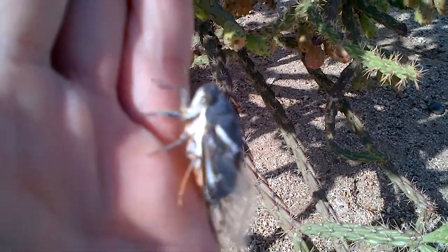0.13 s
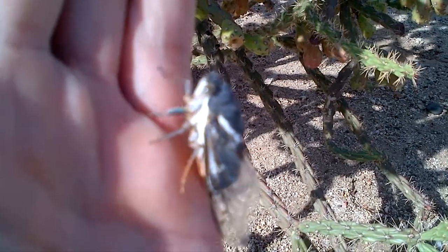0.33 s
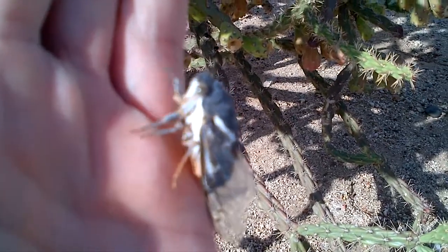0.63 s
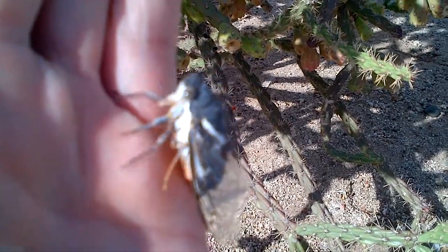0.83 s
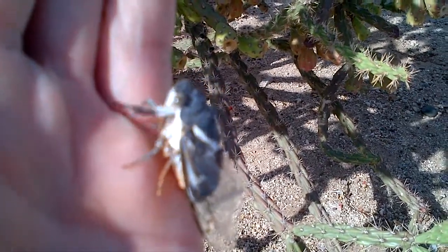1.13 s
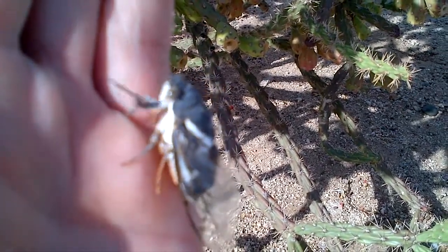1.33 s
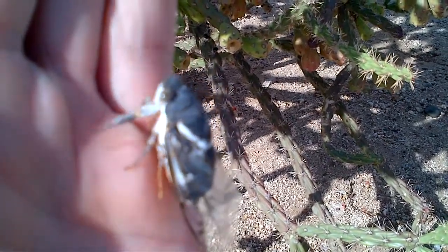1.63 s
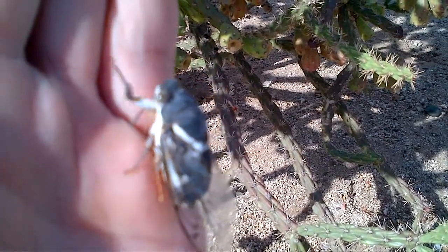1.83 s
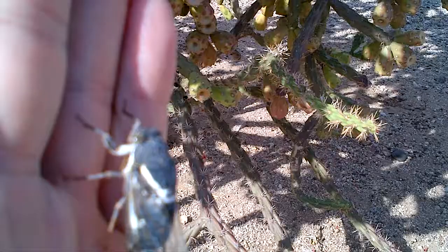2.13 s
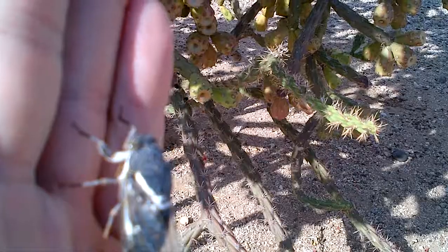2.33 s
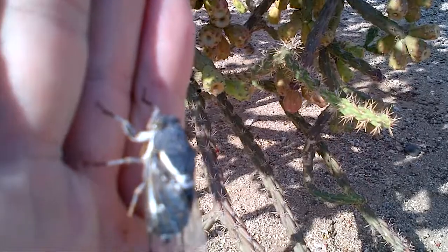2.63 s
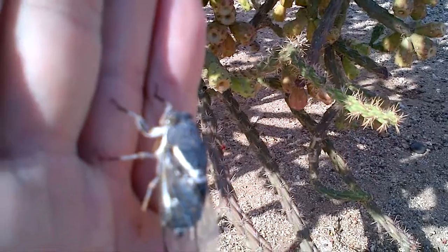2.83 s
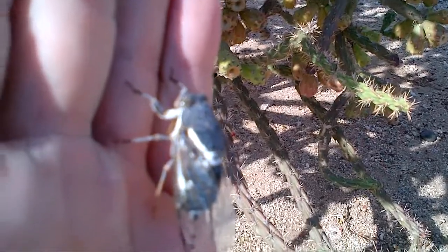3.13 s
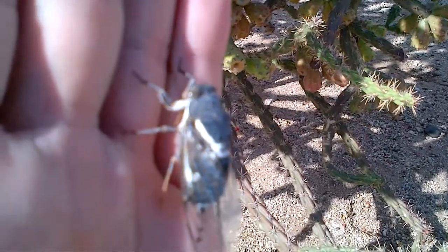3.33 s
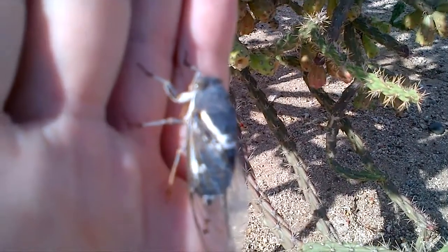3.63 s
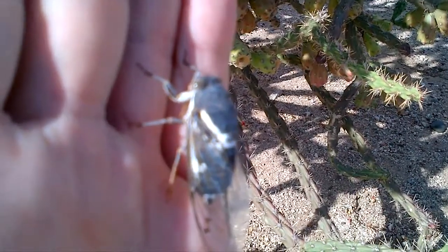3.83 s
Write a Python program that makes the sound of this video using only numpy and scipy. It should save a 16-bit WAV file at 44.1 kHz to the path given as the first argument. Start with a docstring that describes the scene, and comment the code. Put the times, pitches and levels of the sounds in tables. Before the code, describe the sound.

A cicada starts a loud, pulsing buzz up close after knocks on the microphone.

```python
"""Cicada on a hand

A quiet desert garden, one microphone. Close up, a hand knocks on the microphone housing, then the cicada
sitting on it starts to buzz. Its tymbals buckle about 470 times a second, each cycle a quick downward
sweep of rib clicks, and the buzz swells into short loud bursts about 31 times a second.
Far off, birds whistle over still air and a low hum; two light puffs of wind touch the microphone."""
import sys
import numpy as np
from scipy import signal
from scipy.fft import rfft, irfft
from scipy.io import wavfile

SR = 44100
rng = np.random.default_rng(int(sys.argv[2]) if len(sys.argv) > 2 else 0)


def int16_out(signal):
    """Quantize to a 16-bit WAV file."""
    q = np.round(np.clip(np.atleast_2d(signal).T, -1, 1) * 32767)
    wavfile.write(sys.argv[1], SR, q.astype(np.int16))


N = 176400

CALL_START_S, ONSET_S = 2.13, .006
STEADY_HZ, WHINE_HARMONIC = 470.6, 5
JITTER, STRAIN_JITTER = .0012, .25  # the beat gets uneven away from its steady rate
PHASE_WANDER_RAD = .32
# How fast the tymbals buckle (time [s], rate [Hz])
TYMBAL_RATE = [(2.15, 464.6), (2.44, 470), (2.63, 470.7), (3.0, 470.6), (3.07, 472.5), (3.154, 479),
               (3.18, 469.3), (3.26, 470.8), (3.58, 471), (3.65, 469), (3.738, 464.3), (3.87, 469.6),
               (3.925, 478), (3.99, 465.7)]


def cicada(t):
    """On the hand, close to the microphone: buckling tymbals give a pulsing buzz, a whine and a rasp."""
    rate, = curves(TYMBAL_RATE, t)
    unevenness = JITTER + STRAIN_JITTER * np.abs(rate / STEADY_HZ - 1)
    phase = 2 * np.pi * np.cumsum(rate * (1 + unevenness * wander(300))) / SR
    call = tymbal_buzz(t, phase) + whine(t, phase)
    return call * np.clip((t - CALL_START_S) / ONSET_S, 0, 1)


BURST_DB, BURST_TREBLE_DB, SOFT_DB, RING_ON_DB = -6.5, 6, -3.5, -5  # added to the table levels
SCATTER_DB, SHIMMER_DB, SOFT_SHIMMER_DB = .6, 2, 3.5
OPENING_S, THIN_DB = .34, -16  # the lowest harmonics of the bursts fill in as the call gets going
REBOUND_CYCLES, REBOUND_FROM_HZ = .565, 5400  # a second, bright click within each tymbal cycle
REBOUND_SHARE, REBOUND_OPENING_EXTRA = .37, .17
RIPPLE_DB, RIPPLE_SPAN_HZ = 1.8, 7000  # broad changes of colour from burst to burst
# How the bursts evolve (time [s], length [ms], level below 5 kHz [dB], level at 5-9.6 kHz [dB])
BURST_SHAPE = [(2.154, 3.7, -31.5, -36), (2.284, 4.6, -32, -30), (2.316, 4.9, -35, -33.5),
               (2.447, 7.5, -34.5, -29.5), (2.545, 8.1, -34, -29.5), (2.611, 5.5, -30.5, -25),
               (2.677, 6.9, -26, -25.5), (2.71, 3.9, -27, -24.5), (2.777, 8.1, -29.5, -27),
               (2.943, 7, -28, -27.5), (3.01, 8.9, -33, -26.5), (3.043, 7.9, -28.5, -25.5),
               (3.076, 8.2, -29.5, -25), (3.174, 7.1, -27, -25.5), (3.22, 11.3, -31.5, -24),
               (3.301, 11.3, -30, -28.5), (3.431, 8.2, -30.5, -25.5), (3.686, 11.8, -30, -27),
               (3.715, 8.8, -37.5, -28), (3.747, 10.7, -36.5, -28), (3.811, 10.5, -29, -24.5),
               (3.905, 10, -26, -27), (3.971, 9.5, -29, -25.5)]
# The buzz under the bursts (time [s], level between bursts [dB], treble level [dB])
SOFT_LEVELS = [(2.17, -46.5, -41), (2.43, -48, -38), (2.5, -43.5, -35), (2.62, -38.5, -35.5),
               (2.793, -41.5, -35.5), (3.026, -40, -36), (3.059, -42, -36), (3.092, -40, -36),
               (3.22, -45, -36.5), (3.447, -37.5, -36), (3.479, -46.5, -37.1), (3.512, -41, -35.5),
               (3.576, -47, -37.5), (3.609, -42, -34.5), (3.639, -47, -37.5), (3.67, -43, -37.5),
               (3.924, -40.5, -36.5), (3.955, -48, -37), (3.987, -42, -36.5)]
# Colour of the insect's body in the bursts (frequency [Hz], gain [dB])
BURST_COLOUR = [(1880, -39), (2820, -9), (3290, -4.5), (3760, 2.5), (4230, 4), (4700, -0.5), (5170, -4),
                (5640, -1.5), (6100, -3), (7520, -3), (9400, -7), (9870, -13.5), (10340, -10), (11280, -6),
                (12700, -19.5), (15040, -40)]
# Its colour in the soft buzz (frequency [Hz], gain [dB])
SOFT_COLOUR = [(940, -30.5), (1410, -29), (1880, -22.5), (2820, -18.5), (3290, -7), (4230, -7.5),
               (4700, -3), (5640, -11), (8900, -11), (9870, -6.5), (11000, -4), (12220, -11.5),
               (15040, -15.5)]
# When each frequency sounds within one tymbal cycle (frequency [Hz], delay [ms])
RIB_SWEEP = [(2500, 1.7), (3700, 1.4), (4500, 1.15), (5600, .72), (7000, .45), (9500, .1), (12000, .9),
             (15000, .3)]


def tymbal_buzz(t, phase):
    """Rib clicks and their rebounds as a stack of harmonics plus rasp: loud in bursts, soft between."""
    length_ms, low_db, high_db = curves(BURST_SHAPE, t)
    between_db, treble_db = curves(SOFT_LEVELS, t)
    gate = burst_gate(t, length_ms)
    burst = gate * undb(SCATTER_DB * wander(30))
    opening = np.clip(1 - (t - CALL_START_S) / OPENING_S, 0, 1)
    harmonics_hz = np.arange(1, 33) * STEADY_HZ
    lags = 2 * np.pi * np.cumsum(at_hz(RIB_SWEEP, harmonics_hz)) * STEADY_HZ / 1000
    ripple = RIPPLE_DB * (wander(31) + 1j * wander(31))
    buzz = np.zeros(N)
    for k, (hz, lag) in enumerate(zip(harmonics_hz, lags), 1):
        if k == WHINE_HARMONIC:
            continue
        click = np.exp(1j * (k * phase - lag + PHASE_WANDER_RAD * wander(20)))
        rebound = (REBOUND_SHARE + REBOUND_OPENING_EXTRA * opening) * (hz > REBOUND_FROM_HZ)
        pair = click * (1 + rebound * np.exp(-2j * np.pi * k * REBOUND_CYCLES)) / np.hypot(1, rebound)
        is_treble = hz > 9600
        body_db = (low_db if hz < 5000 else high_db) + BURST_DB
        loud_db = at_hz(BURST_COLOUR, hz) + (treble_db + BURST_TREBLE_DB if is_treble else body_db)
        loud_db += THIN_DB * opening * (hz < 3500) + SHIMMER_DB * wander(30)
        shimmer_db = SOFT_SHIMMER_DB * wander(24.875)
        if is_treble or k < WHINE_HARMONIC:  # both ends of the spectrum ring on through the bursts
            soft = undb(treble_db + RING_ON_DB + shimmer_db / 2)
        else:
            ripple_db = np.real(ripple * np.exp(2j * np.pi * hz / RIPPLE_SPAN_HZ))
            loud_db += ripple_db
            soft = (1 - gate) * undb(between_db + SOFT_DB + shimmer_db + ripple_db)
        buzz += burst * undb(loud_db) * pair.real
        buzz += soft * undb(at_hz(SOFT_COLOUR, hz)) * pair.imag
    return np.sqrt(2) * buzz + rasp(burst * undb(high_db), undb(treble_db))


FIRST_BURST_S, EDGE_MS = 2.1537, 1
# Pace of the bursts (time [s], rate [Hz])
BURST_RATE = [(2.14, 30.86), (2.48, 30.58), (2.66, 30.12), (2.9, 29.96), (3.08, 30.34), (3.2, 31.55),
              (3.36, 30.77), (3.55, 31.0), (3.68, 32.76), (3.84, 30.71), (4.0, 32.15)]


def burst_gate(t, length_ms):
    """The pulse of the call: 1 during each loud burst, 0 between them."""
    rate, = curves(BURST_RATE, t)
    cycles = np.cumsum(rate) / SR
    cycles -= np.interp(FIRST_BURST_S, t, cycles)
    from_centre_ms = 1000 * np.abs(cycles - np.round(cycles)) / rate
    return np.clip((length_ms / 2 - from_centre_ms) / EDGE_MS + .5, 0, 1)


WHINE_TRIM_DB = -.5
# Strength of the whine (time [s], level [dB])
WHINE_LEVEL = [(2.15, -58.5), (2.294, -57), (2.53, -48), (2.664, -45), (2.762, -55.5), (3.056, -44.5),
               (3.092, -60), (3.184, -43), (3.226, -83), (3.272, -52.5), (3.468, -44), (3.53, -63),
               (3.56, -50), (3.768, -49.5), (3.834, -63), (3.866, -44), (3.974, -56.5), (4.0, -43)]


def whine(t, phase):
    """The tymbals' fifth harmonic, a thin tone under the buzz."""
    level_db, = curves(WHINE_LEVEL, t)
    tone = np.sqrt(2) * np.cos(WHINE_HARMONIC * phase + PHASE_WANDER_RAD * wander(20))
    return undb(level_db + WHINE_TRIM_DB + wander(22.85)) * tone


BURST_RASP_DB, SOFT_RASP_DB = -4.5, -5
# Colour of the rasp in the bursts (frequency [Hz], gain [dB])
BURST_RASP_COLOUR = [(2200, -25.5), (3500, -3.5), (6500, 2), (11500, -9), (15000, -13)]
# Colour of the soft rasp throughout the call (frequency [Hz], gain [dB])
SOFT_RASP_COLOUR = [(1500, -25.5), (3300, -6), (7000, -16), (10800, -1), (12300, -7), (15000, -16)]


def rasp(burst_gain, treble_gain):
    """The noisy edge of the buzz: one hiss pulses with the bursts, another follows the treble."""
    pulsing = burst_gain * undb(BURST_RASP_DB) * noise(BURST_RASP_COLOUR)
    return pulsing + treble_gain * undb(SOFT_RASP_DB) * noise(SOFT_RASP_COLOUR)


THUD_DB, THUD_S, RING_DB = -19, .002, -15.5
TICK_HZ, TICK_S = 3000, .0013
# The hand on the housing (time [s], push level [dB], push frequency [Hz], tick relative to push [dB])
KNOCKS = [(.087, -39.5, 1110, -41), (.179, -38.5, 756, -4.5), (0.86, -38.5, 257, -28),
          (.864, -37, 970, -30), (1.946, -34.5, 477, -5.5), (1.952, -32.5, 560, -22),
          (1.9668, -8.5, 3100, -10.5), (1.967, -10.5, 518, -9.5), (1.9688, -19, 955, -24),
          (1.9712, -29.5, 584, -30), (2.015, -33, 850, -38), (2.0973, -38, 1800, -10),
          (2.1228, -10.5, 470, -12), (2.1239, -22.5, 6040, -7), (2.128, -12.5, 534, -12)]
# Modes of the microphone housing (frequency [Hz], relative level [dB], t60 [s])
HOUSING_MODES = [(462, 5.5, 0.015), (685, -6.5, 0.033), (827, -6, 0.013), (1070, 5, 0.019),
                 (1990, -21, 0.01), (2840, -2, 0.011)]


def handling_knocks(t):
    """Right at the microphone: a short push and a dull thud ring the housing, with a tick of contact."""
    pushes, tick_level = np.zeros(N), np.zeros(N)
    for when, db, hz, tick_db in KNOCKS:
        spread = (np.pi * hz * (t - when)) ** 2
        push = (1 - 2 * spread) * np.exp(-spread)
        thud = undb(THUD_DB) * np.exp(-((t - when) / THUD_S) ** 2)
        pushes += undb(db) * (push + thud)
        age = t - when + 1 / hz / 4  # contact comes a quarter cycle before the peak
        tick_level += undb(db + tick_db) * (age > 0) * np.exp(-np.clip(age / TICK_S, 0, 50))
    age = t[:SR // 10]
    modes = sum(undb(db - 60 * age / t60) * np.sin(2 * np.pi * hz * age) * 2 * np.pi * hz / SR
                for hz, db, t60 in HOUSING_MODES)
    ring = undb(RING_DB) * signal.fftconvolve(pushes, modes)[:N]
    return pushes + ring + tick_level * unit_rms(lowpass(rng.standard_normal(N), TICK_HZ))


ECHO_DB, ECHO_DECAY_S = -6.5, .027
# Far birds (time [s], length [s], first pitch [Hz], middle [Hz], last [Hz], level [dB], blur [Hz])
BIRD_NOTES = [(-.01, 0.13, 3930, 3270, 2700, -57, 39.5), (0.173, 0.03, 2550, 2940, 3000, -58.5, 40),
              (0.221, 0.029, 2900, 2600, 2270, -61, 110), (0.389, 0.022, 3470, 2770, 2570, -58.5, 90),
              (0.552, 0.14, 3900, 3830, 3870, -61.5, 171), (0.562, 0.03, 3280, 3280, 3210, -63.5, 303),
              (.67, 0.12, 3360, 3370, 3050, -62.5, 327), (0.834, 0.096, 4800, 4540, 4320, -63, 408),
              (0.975, 0.121, 2920, 2885, 2770, -62.5, 269), (1.28, 0.095, 2750, 2630, 2510, -65, 270),
              (1.488, .05, 5300, 5300, 5250, -68, 242), (1.777, 0.082, 5280, 5200, 5200, -67.5, 238)]


def far_birds(t):
    """Gliding whistles, blurred by distance and scattered by the ground and plants."""
    notes = np.zeros(N)
    for start, length, first_hz, middle_hz, last_hz, db, blur_hz in BIRD_NOTES:
        progress = np.clip((t - start) / length, 0, 1)
        hz = np.interp(progress, [0, .5, 1], [first_hz, middle_hz, last_hz]) + blur_hz * wander(500)
        envelope = np.sqrt(2 * np.abs(np.sin(np.pi * progress)))
        notes += undb(db) * envelope * np.sin(2 * np.pi * np.cumsum(hz) / SR)
    tail = rng.standard_normal(SR // 2) * np.exp(-t[:SR // 2] / ECHO_DECAY_S)
    return notes + undb(ECHO_DB) * signal.fftconvolve(notes, tail / np.linalg.norm(tail))[:N]


AIR_DB, SWELL_DB = -50.5, -2.5
# Air all around the microphone (frequency [Hz], relative density [dB])
AIR_COLOUR = [(12, -37), (20, -16.5), (64, -2.5), (85, -14.5), (119, 0.5), (148, -13), (232, -11),
              (404, -19), (439, -20.5), (478, -20.5), (649, -19.5), (1670, -30), (3850, -32.5),
              (4310, -34.5), (15500, -39.5)]


def garden_air():
    """Still outdoor air whose low end gently swells and sinks."""
    air = undb(AIR_DB) * noise(AIR_COLOUR)
    return air + lowpass(air, hz=650) * (undb(SWELL_DB * wander(4.77)) - 1)


HUM_HZ, HUM_DRIFT = 118.2, .015
HUM_DB, HUM_OCTAVE_DB, HUM_WAVER_DB = -57, -63, 1.8


def distant_hum():
    """A low tone and its octave from far off, wavering in pitch and level."""
    phase = 2 * np.pi * np.cumsum(HUM_HZ * (1 + HUM_DRIFT * wander(13))) / SR
    return sum(np.sqrt(2) * undb(db + HUM_WAVER_DB * wander(4.7)) * np.sin(k * phase)
               for k, db in enumerate((HUM_DB, HUM_OCTAVE_DB), 1))


# Wind on the microphone (time [s], half-width [s], level [dB])
WIND_PUFFS = [(.43, 0.061, -46), (0.551, 0.02, -42)]


def wind_puffs(t):
    """Light puffs brush the microphone, each a brief low rumble."""
    level = sum(undb(db) * np.exp(-((t - when) / width) ** 2) for when, width, db in WIND_PUFFS)
    return level * unit_rms(lowpass(rng.standard_normal(N), hz=110))


def undb(db):
    """Decibels to gain."""
    return 10 ** (np.asarray(db) / 20)


def unit_rms(x):
    """Scale to rms 1."""
    return x / np.sqrt(np.mean(x ** 2))


def curves(table, t):
    """Every column of a time table, joined by straight lines."""
    rows = np.array(table, float)
    return [np.interp(t, rows[:, 0], column) for column in rows.T[1:]]


def at_hz(points, hz):
    """Read (Hz, value) points on a log-frequency axis."""
    rows = np.array(points, float)
    return np.interp(np.log(np.maximum(hz, 1)), np.log(rows[:, 0]), rows[:, 1])


def noise(colour):
    """Noise of rms 1 with the given (Hz, dB) colour."""
    gain = undb(at_hz(colour, np.fft.rfftfreq(N, 1 / SR)))
    return unit_rms(irfft(rfft(rng.standard_normal(N)) * gain, N))


def lowpass(x, hz):
    """Second-order low-pass."""
    return signal.sosfilt(signal.butter(2, hz, fs=SR, output="sos"), x)


def wander(rate):
    """A smooth random curve of spread near 1, renewed rate times a second."""
    place = np.arange(N) / SR * rate
    values, k = rng.standard_normal(2 ** 14), place.astype(int)
    part = place - k
    return values[k] + (values[k + 1] - values[k]) * part ** 2 * (3 - 2 * part)


def scene():
    """One microphone: the cicada and the knocks close by, the garden behind."""
    t = np.arange(N) / SR
    return (cicada(t) + handling_knocks(t) + far_birds(t) + garden_air() + distant_hum()
            + wind_puffs(t))[None]


def record(dry, ceiling=.32, top_hz=15300):
    """The recorder flattens the highest peaks and cuts the top."""
    limited = dry / (1 + (dry / ceiling) ** 8) ** (1 / 8)
    return signal.sosfilt(signal.ellip(8, .2, 70, top_hz, fs=SR, output="sos"), limited)


dry = scene()
out = record(dry)
int16_out(out)
```